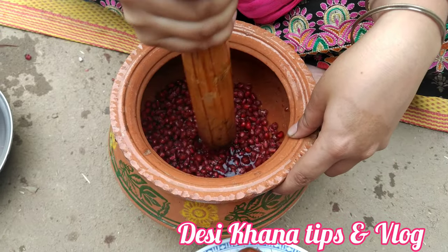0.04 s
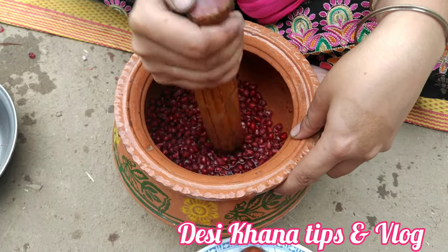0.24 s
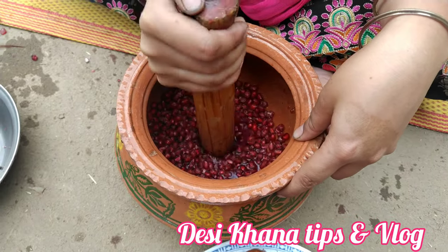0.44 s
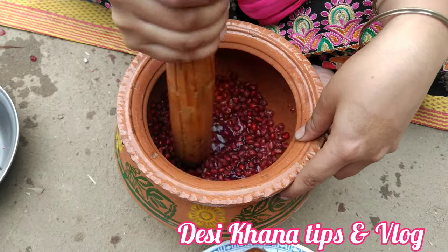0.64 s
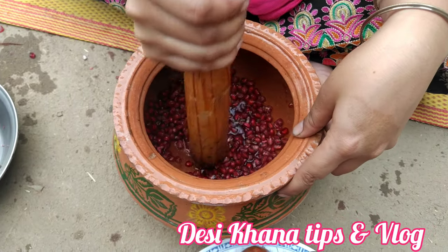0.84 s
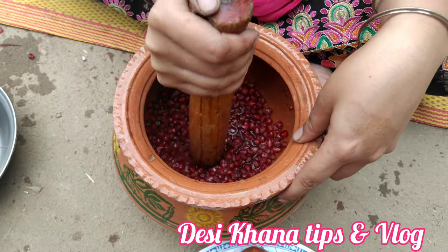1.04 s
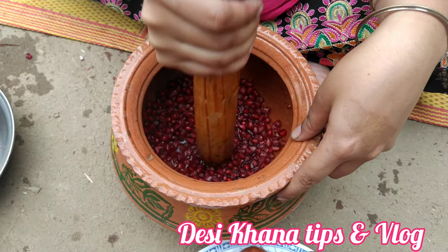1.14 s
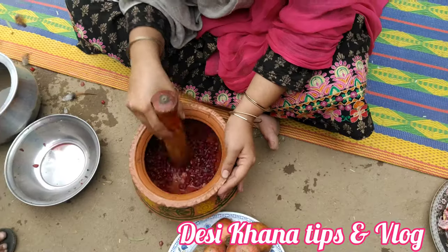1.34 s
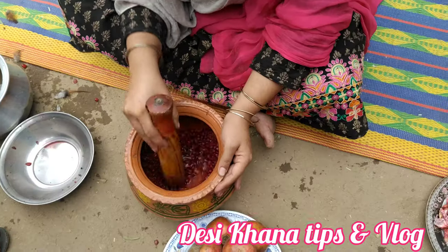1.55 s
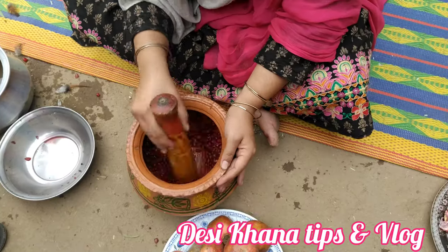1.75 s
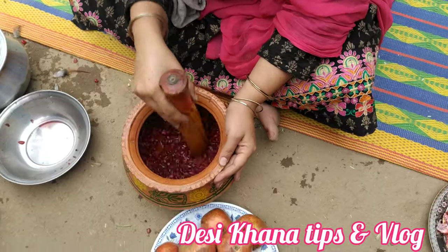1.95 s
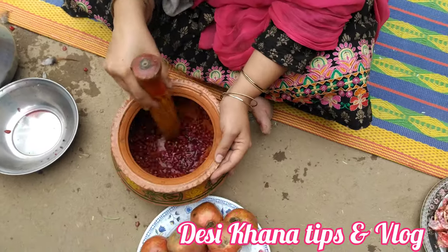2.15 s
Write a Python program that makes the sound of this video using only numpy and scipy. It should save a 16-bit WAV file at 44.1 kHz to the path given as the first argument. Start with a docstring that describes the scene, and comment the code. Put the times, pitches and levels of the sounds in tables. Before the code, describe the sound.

A wooden pestle pounds juicy seeds in a clay bowl, close by in quiet outdoor air. Four blows land at about 0.2, 0.5, 0.8 and 1.1 seconds, each a wet crunch and a short thud, the third weaker. From 1.2 seconds the pestle stirs the pulp in softer squishing strokes. It knocks the wall with a brief ring at 1.7 seconds, and a small plop comes around 2.1.

```python
"""A wooden pestle pounds juicy seeds in a clay bowl, outdoors, close to a pair of microphones.
Over quiet air and the faint ticking of wet pulp come four blows: in each the seeds crunch and burst,
then the pestle thuds on the bottom and the bowl rings briefly. After that the pestle stirs the pulp
in squishing strokes, knocks once against the wall on the way, and an air pocket plops near the end."""
import sys
import numpy as np
from scipy import signal
from scipy.fft import rfft, irfft
from scipy.io import wavfile

SR = 44100
rng = np.random.default_rng(int(sys.argv[2]) if len(sys.argv) > 2 else 0)


def master(y):
    """Save y as 16-bit WAV."""
    cut = np.clip(np.atleast_2d(y).T, -1, 1)
    pcm = np.round(cut * 32767)  # scale
    wavfile.write(sys.argv[1], SR, pcm.astype(np.int16))


N = 97020

# modes of the bowl and its air: pitch_hz, bottom_struck_db, wall_struck_db, t60_s
BOWL_MODES = [(326, 5, -17, 0.038), (441.5, 4.5, -20, 0.17), (733, 0.5, -1, 0.16), (1049, 5, -33, 0.1),
              (1200, -30, -23, 0.13), (1257, -16, -2.5, 0.027), (1826, -9, -6, 0.028), (1895, 2, -4, 0.049),
              (2250, 7, -15, 0.025), (2940, 15, -8.5, 0.034)]
# tone of the pestle's hard contact: frequency_hz, level_db
CONTACT_EQ = [(300, -25), (800, -42), (1500, 5), (1900, -5.5), (2400, -0.5), (3200, -8.5), (6000, -11.5),
              (12000, -16)]
CONTACT_HOLD_S, CONTACT_T60_S = 0.0036, 0.0038


def amp(db):
    """Decibels to gain."""
    return 10 ** (np.asarray(db) / 20)


def unit(x):
    """Scale to rms 1."""
    return x / np.sqrt(np.mean(x ** 2) + 1e-20)


def along(points, hz):
    """Read a curve of (Hz, value) points on a log frequency axis."""
    f, values = np.transpose(points)
    return np.interp(np.log(hz + 1), np.log(f + 1), values)


def bell(hz, centre_hz, octaves):
    """A bump of height 1 on the octave axis."""
    return np.exp(-.5 * (np.log2((hz + 1) / centre_hz) / octaves) ** 2)


def grid():
    """Frequencies of the filter grid in Hz."""
    return np.fft.rfftfreq(2 ** 17, 1 / SR)


def clock():
    """Time of every sample in seconds."""
    return np.arange(N) / SR


def filtered(x, response):
    """Apply a frequency response given on the filter grid."""
    return irfft(rfft(x, 2 * (len(grid()) - 1)) * response)[..., :N]


def coloured(x, colour_db):
    """Minimum-phase EQ of unit power: nothing rings ahead of an attack."""
    cepstrum = irfft(np.log(np.maximum(unit(amp(colour_db)), 1e-6)))
    half = len(cepstrum) // 2
    cepstrum[1:half] *= 2
    cepstrum[half + 1:] = 0
    return filtered(x, np.exp(rfft(cepstrum)))


def puff(start_s, hold_s, t60_s):
    """A dense spray of tiny impulses that starts, holds and dies."""
    t = clock() - start_s
    return rng.choice([-1, 1], N) * (t >= 0) * amp(-60 * np.maximum(t - hold_s, 0) / t60_s)


def ring(start_s, hz, t60_s, blur_hz=0, attack_s=.0022):
    """One damped mode; shifting contact blurs its pitch."""
    t = np.arange(SR // 2) / SR
    drift = np.cumsum(rng.standard_normal(len(t))) * np.sqrt(2 * np.pi * blur_hz / SR)
    envelope = amp(-60 * t / t60_s) * (1 - np.exp(-t / attack_s))
    tone = np.sin(2 * np.pi * hz * t + drift) * envelope
    return np.pad(tone, (round(start_s * SR), N))[:N]


def crackle(per_s, spread_db, hz, cycles):
    """Tiny wet pops of random size, pitched over three octaves around hz; rms 1."""
    draws = rng.random((8000, 4))
    starts_s = np.cumsum(-np.log(draws[:, 0])) / per_s
    inside = starts_s < N / SR
    draws, starts_s = draws[inside], starts_s[inside]
    age = np.arange(384)  # samples
    pitch_hz = np.minimum(hz * 2 ** (3 * draws[:, 1:2] - 1.5), SR / 3)
    turns = pitch_hz * age / SR
    size = amp(spread_db * np.minimum(-np.log(draws[:, 2:3]), 4))
    pops = size * np.sin(2 * np.pi * turns) * np.exp(-turns / cycles) * np.sqrt(pitch_hz / SR)
    places = (starts_s * SR).astype(int)[:, None] + age
    return unit(np.bincount(places.ravel(), pops.ravel(), N)[:N])


def outdoor_air():
    """A quiet bed: the low rumble is alike at both microphones, the hiss is unrelated."""
    # tone of the background: frequency_hz, level_db
    air_eq = [(20, 3), (45, -12.5), (62, 4), (75, 8.5), (92, 1.5), (200, 3), (450, -3), (800, -12),
              (2200, -10), (5500, -13), (9500, -7.5), (12000, -17.5)]
    f = grid()
    coherence = .7 / (1 + (f / 850) ** 2)
    width = np.arccos(coherence) / 2
    mid_side_gain = amp(along(air_eq, f)) * np.array([np.cos(width), np.sin(width)])
    mid, side = filtered(rng.standard_normal((2, N)), mid_side_gain)
    return amp(-56.5) * unit(np.array([mid + side, mid - side]))


def settling_pulp():
    """The wet pulp ticks faintly all the time."""
    return amp(-68) * crackle(per_s=45, spread_db=2, hz=4500, cycles=4)


def bursting_seeds(fall_db_per_s=846):
    """Skins snap, each with its own pitch, inside a crunch that swells under the blow."""
    # single seeds bursting: start_s, level_db, pitch_hz, pitch_boost_db
    bursts = [(0.2152, -36, 10200, 14), (0.2214, -14.5, 2980, 3.5), (0.2277, -17, 2200, 28),
              (0.2318, -22, 2450, 35), (0.2585, -38, 4500, 12), (0.2878, -43, 4200, 22),
              (0.5016, -13, 7500, 3), (0.5133, -21.5, 9200, 5.5), (0.5238, -28, 2600, 6),
              (0.804, -27.5, 8500, 9), (0.8125, -35, 7000, 3), (1.0866, -14, 4650, 17),
              (1.1022, -22.5, 10500, 1), (1.104, -24, 2200, 40), (1.2435, -33.5, 8530, 8),
              (1.3415, -29, 2900, 28), (1.566, -31, 2090, 28), (1.5738, -27.5, 3100, 29),
              (1.5964, -26.5, 2600, 60), (1.637, -35, 3700, 16), (1.879, -35.5, 2300, 13),
              (1.9085, -33, 2400, 26), (2.051, -32, 3170, 49)]
    # tone of a snapping skin: frequency_hz, level_db
    snap_eq = [(200, -57), (800, -26.5), (1500, -7.5), (3000, -1), (6000, -7), (9000, 3), (12000, -5)]
    # seeds crunching under each blow: peak_s, level_db, rise_db_per_s
    crunches = [(0.232, -27.5, 1500), (0.505, -33, 614), (0.808, -31, 630), (1.099, -44, 892)]
    # tone of the crunch: frequency_hz, level_db
    crunch_eq = [(200, -12), (1200, 1), (1800, 4.5), (4000, 14), (5500, 6), (8500, 12.5), (12000, 5.5)]
    f, t = grid(), clock()
    snaps = np.zeros(N)
    for s, db, hz, boost_db in bursts:
        colour_db = along(snap_eq, f) + boost_db * bell(f, hz, octaves=0.4)
        snaps += amp(db) * coloured(puff(s, hold_s=0.0012, t60_s=.012), colour_db)
    pressure = sum(amp(db - np.maximum((s - t) * rise, (t - s) * fall_db_per_s))
                   for s, db, rise in crunches)
    grains = crackle(per_s=1700, spread_db=3.5, hz=4480, cycles=5.2) + 0.91 * rng.standard_normal(N)
    return snaps + pressure * unit(coloured(grains, along(crunch_eq, f)))


def pestle_blows():
    """Each blow crushes the bottom layer, thuds and rings the pulp-damped bowl."""
    # the pestle bottoming out: start_s, crush_db, thud_db, thud_hz, ring_db
    hits = [(0.2168, -44, -22.5, 520, -81), (0.2327, -28, -15, 381, -36), (0.5125, -17, -22.5, 372, -57),
            (.809, -37, -41.5, 380, -60.5), (1.058, -58, -42, 450, -64), (1.1001, -24, -21.5, 467, -48)]
    # tone of the thud's noise: frequency_hz, level_db
    thud_eq = [(40, -10.5), (240, -1), (480, 6.5), (740, -14.5), (1150, 1.5), (4000, -26)]
    f = grid()
    crush = sum(amp(db) * puff(s, CONTACT_HOLD_S, CONTACT_T60_S) for s, db, *_ in hits)
    thud_tone = sum(amp(db) * ring(s, hz, t60_s=.03) for s, _, db, hz, _ in hits)
    thud_noise = sum(amp(db - 14) * puff(s, hold_s=0.001, t60_s=0.062) for s, _, db, *_ in hits)
    bowl = sum(amp(db + mode_db) * ring(s, hz, t60_s, blur_hz=14)
               for s, *_, db in hits for hz, mode_db, _, t60_s in BOWL_MODES)
    thud = thud_tone + coloured(thud_noise, along(thud_eq, f))
    return coloured(crush, along(CONTACT_EQ, f)) + thud + bowl


def rocking_bowl(low_cut_hz=63.3):
    """Pushed by the pestle, the bowl rocks dully on the ground."""
    # pushes of the pestle: start_s, hold_s, level_db, high_cut_hz
    pushes = [(0.501, 0.0071, -48.5, 156), (0.796, 0.01, -55, 112), (1.105, 0.013, -51.5, 131),
              (1.128, 0.029, -48.5, 194), (1.342, 0.023, -46, 500), (2.125, 0.015, -41.5, 830)]
    f = grid() + 1
    bumps = np.zeros(N)
    for s, hold_s, db, high_cut_hz in pushes:
        band_db = -10 * np.log10((1 + (f / high_cut_hz) ** 6) * (1 + (low_cut_hz / f) ** 4))
        bumps += amp(db) * coloured(puff(s, hold_s, t60_s=0.096), band_db)
    return bumps


def stirred_pulp(rise_share=0.57, edge_db=-6):
    """Each stroke swells and fades, squeezing out squishy bubbles and a fine, juicy fizz."""
    # strokes through the pulp: peak_s, length_s, squish_db, fizz_db
    strokes = [(1.186, 0.022, -45.5, -51.5), (1.272, 0.016, -44.5, -48.5), (1.336, 0.053, -42.5, -44.5),
               (1.425, 0.043, -46, -49), (1.58, 0.045, -40, -49.5), (1.61, 0.032, -70, -44.5),
               (1.671, 0.039, -45.5, -46), (1.765, 0.088, -47.5, -56), (1.816, 0.013, -43.5, -38.5),
               (1.841, 0.025, -38.5, -46.5), (1.913, 0.021, -36, -41.5), (1.954, 0.023, -45, -60),
               (2.056, 0.07, -39.5, -47), (2.155, 0.025, -46, -42.5), (2.198, 0.019, -41.5, -43)]
    # tone of the squish: frequency_hz, level_db
    squish_eq = [(150, -8), (300, 5), (650, -8), (1350, -8.5), (1800, 1.5), (2500, 0.5), (3400, 2.5),
                 (4800, -8), (12000, -48)]
    # tone of the fizz: frequency_hz, level_db
    fizz_eq = [(2500, -11.5), (5000, -4.5), (7000, -1), (9300, 6), (12000, -7.5)]
    f, t = grid(), clock()
    squish_power, fizz_power = np.zeros((2, N))
    for s, length_s, squish_db, fizz_db in strokes:
        from_peak = np.maximum((s - t) / rise_share, (t - s) / (1 - rise_share)) / length_s
        squish_power += amp(squish_db + edge_db * from_peak) ** 2
        fizz_power += amp(fizz_db + edge_db * from_peak) ** 2
    pops = crackle(per_s=3200, spread_db=3.5, hz=2770, cycles=1.9)
    bubbles = amp(-8.5) * crackle(per_s=570, spread_db=0, hz=2530, cycles=6.2)
    squish = unit(coloured(pops + bubbles + 0.8 * rng.standard_normal(N), along(squish_eq, f)))
    spray = crackle(per_s=3200, spread_db=3.5, hz=6490, cycles=8.1)
    fizz = unit(coloured(spray + .5 * rng.standard_normal(N), along(fizz_eq, f)))
    return np.sqrt(squish_power) * squish + np.sqrt(fizz_power) * fizz


def rubbed_hollow():
    """The rubbing pestle sounds the hollow of the bowl as a narrow band of noise."""
    # swell of the hollow tone: time_s, level_db
    swell = [(1.12, -57), (1.5, -67), (1.7, -60), (1.77, -53), (1.88, -59), (1.92, -52.5), (2.2, -57)]
    envelope = amp(np.interp(clock(), *np.transpose(swell), left=-120))
    return envelope * unit(filtered(rng.standard_normal(N), bell(grid(), centre_hz=464, octaves=0.26)))


def wall_knock(start_s=1.711, ring_db=-18.5, click_db=-37, free_s=0.043, damped_t60_s=0.15):
    """The pestle clicks on the wall and rings it clearly, then comes to rest on it and damps it."""
    bowl = sum(amp(ring_db + mode_db) * ring(start_s, hz, t60_s) for hz, _, mode_db, t60_s in BOWL_MODES)
    damping = amp(-60 * np.maximum(clock() - start_s - free_s, 0) / damped_t60_s)
    click = amp(click_db) * puff(start_s, CONTACT_HOLD_S, CONTACT_T60_S)
    return bowl * damping + coloured(click, along(CONTACT_EQ, grid()))


def plop():
    """An air pocket in the juice rings at one pitch."""
    # the air pocket: start_s, pitch_hz, level_db, t60_s
    pockets = [(2.141, 1002, -37.5, 0.14)]
    return sum(amp(db) * ring(s, hz, t60_s) for s, hz, db, t60_s in pockets)


def echoes(x, t60_s):
    """Diffuse reflections, different at each microphone."""
    t = np.arange(SR // 2) / SR
    tail = rng.standard_normal((2, len(t))) * amp(-60 * t / t60_s) * (t > .001)
    return signal.fftconvolve(x[None], tail / np.linalg.norm(tail[0]), axes=1)[:, :N]


def from_bowl(x, scatter_above_hz, scatter_share=.45, path_change_hz=13):
    """The bowl sits a little to the right; short waves scatter in it on paths the pestle keeps moving."""
    # later arrival at the left microphone: frequency_hz, lag_ms
    left_lag = [(700, .09), (2100, .095), (4300, .175), (11500, .175)]
    f = grid()
    share = scatter_share * f ** 2 / (f ** 2 + scatter_above_hz ** 2)
    delay_s = np.array([[.5], [-.5]]) * along(left_lag, f) / 1000
    direct = filtered(x, np.exp(-2j * np.pi * f * delay_s) * np.sqrt(1 - share))
    short_waves = filtered(x, np.sqrt(share))
    path = 2 * np.pi * path_change_hz * clock()
    scattered = sum(echoes(short_waves * fade, t60_s=.018) for fade in (np.cos(path), np.sin(path)))
    return direct + scattered


def scene():
    """Blows arrive mostly straight, the stirring more diffusely; the yard answers faintly."""
    pounding = bursting_seeds() + pestle_blows() + wall_knock() + rocking_bowl()
    stirring = stirred_pulp() + rubbed_hollow() + plop() + settling_pulp()
    yard = amp(-18) * echoes(pounding + stirring, t60_s=0.17)
    close = from_bowl(pounding, scatter_above_hz=3300) + from_bowl(stirring, scatter_above_hz=250)
    return close + yard + outdoor_air()


def record(dry):
    """Two microphones of unequal colour; the top treble is shelved down and cut."""
    # stereo balance: frequency_hz, left_minus_right_db
    balance = [(60, 1), (300, 2), (750, 1), (1300, 0.5), (2200, 1.5), (3600, 9.5), (4700, -1.5), (6200, -3),
               (8000, -15), (9700, -12.5), (12000, -9)]
    shelf_hz, shelf_db, cut_hz = 12100, -24, 16600
    f = grid()
    microphones = amp(np.array([[.5], [-.5]]) * along(balance, f))
    microphones /= np.sqrt(np.mean(microphones ** 2, axis=0))
    shelf = amp(shelf_db * .5 * (1 + np.tanh((f - shelf_hz) / 150)))
    return filtered(dry, microphones * shelf * (f < cut_hz))


dry = scene()
out = record(dry)
master(out)
```